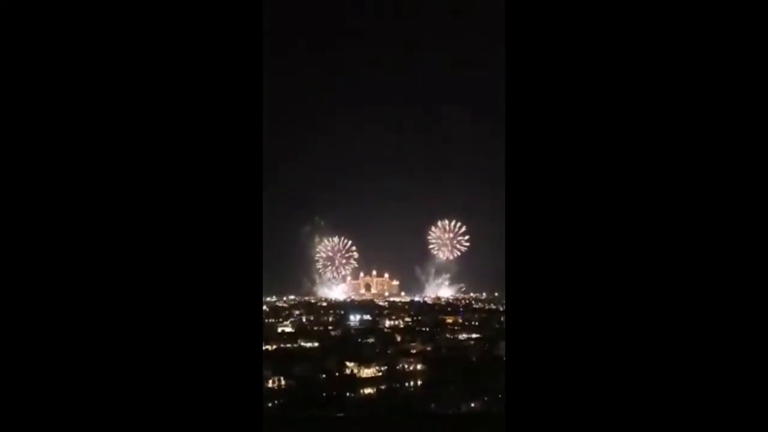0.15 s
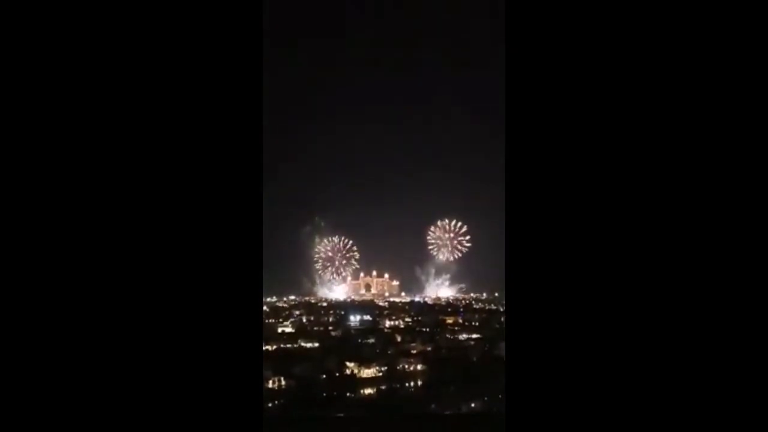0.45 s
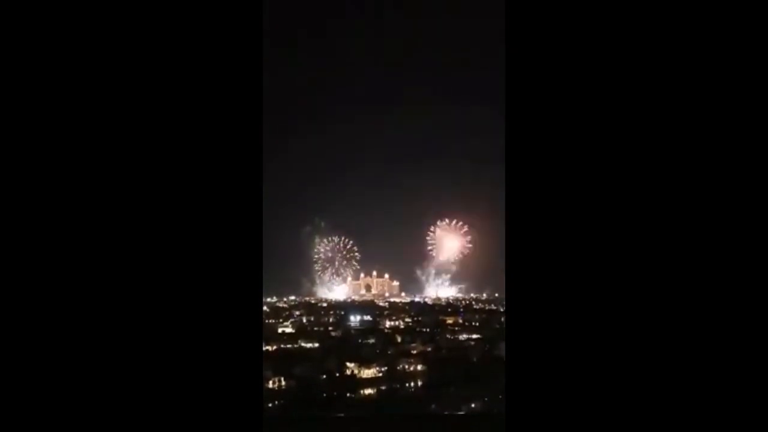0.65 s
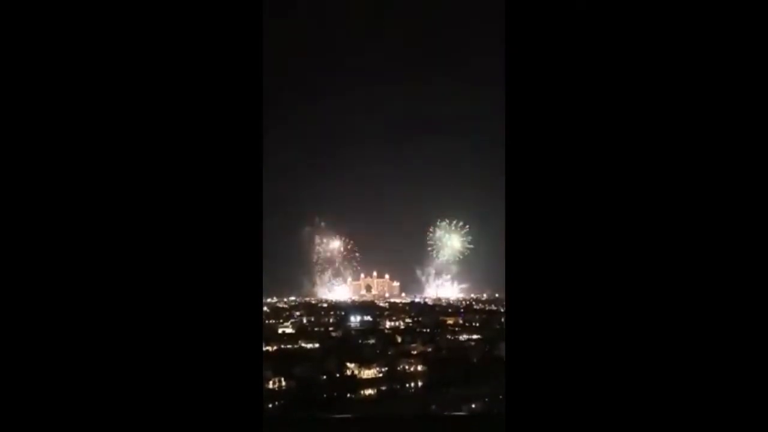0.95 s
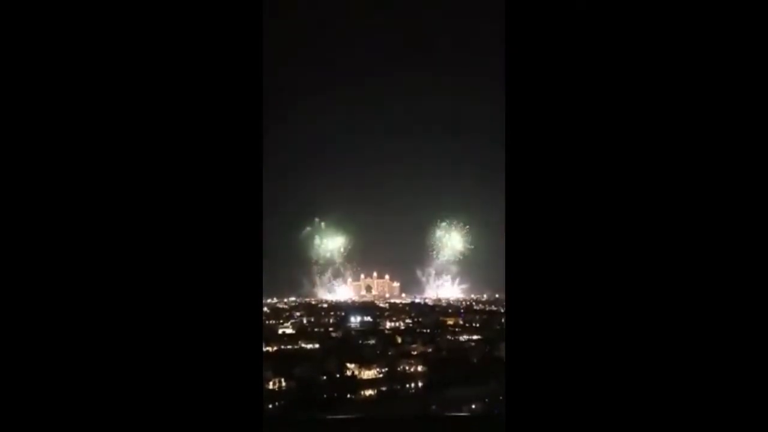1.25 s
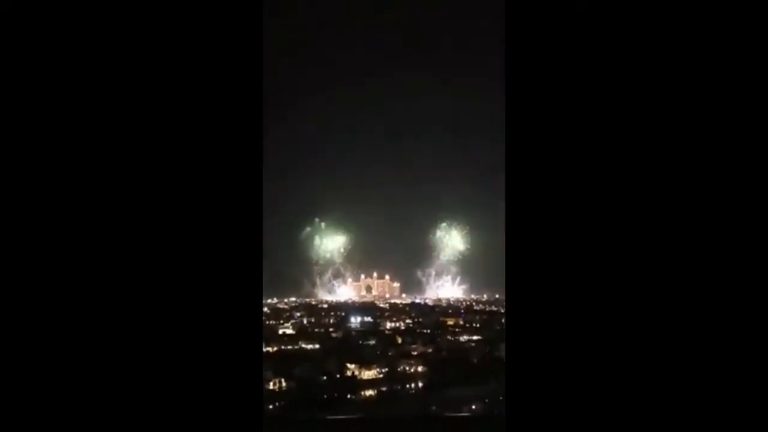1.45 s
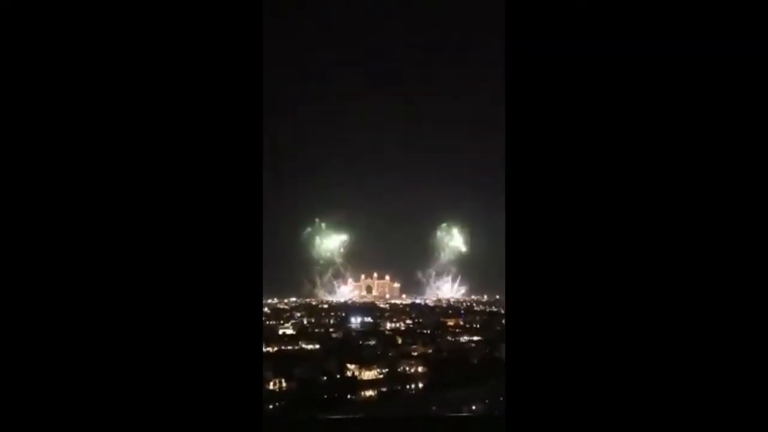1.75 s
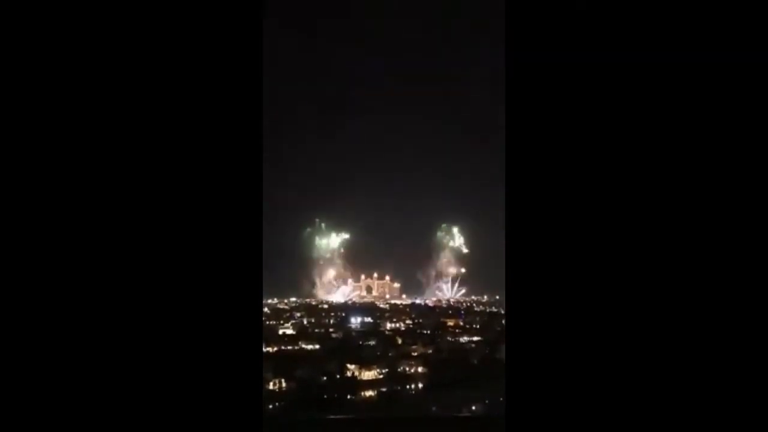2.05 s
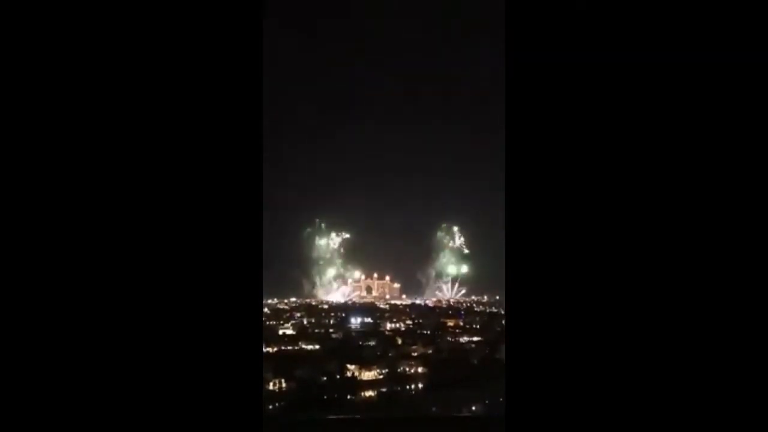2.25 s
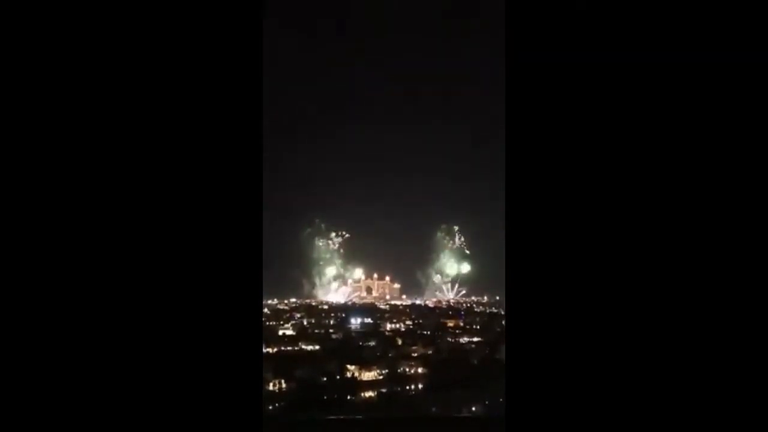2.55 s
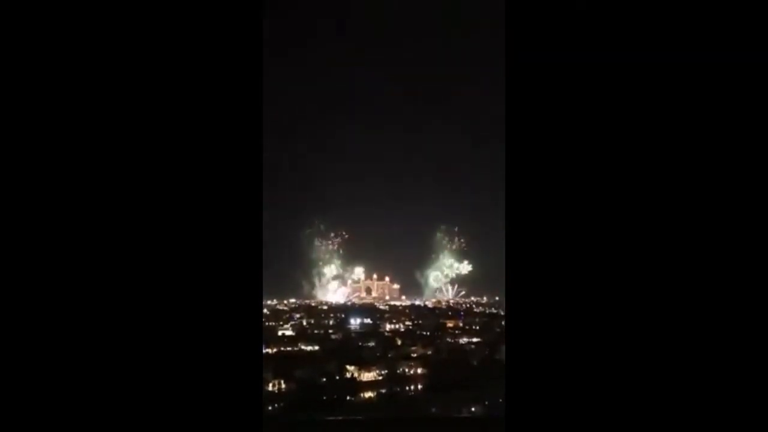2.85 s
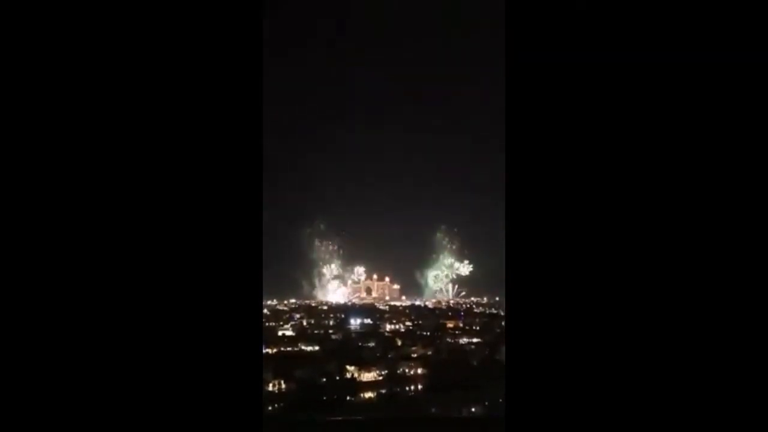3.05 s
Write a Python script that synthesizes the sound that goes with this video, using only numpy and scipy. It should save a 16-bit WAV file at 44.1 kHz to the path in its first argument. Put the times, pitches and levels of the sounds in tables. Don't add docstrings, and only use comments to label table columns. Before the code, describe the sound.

Distant fireworks heard from a balcony at night: a dull double boom early, another midway, then the strongest salvo, each rolling back from buildings over a low traffic hum. Wide stereo, far microphone, treble softened by air.

```python
import sys
import numpy as np
from scipy import signal
from scipy.fft import rfft, irfft
from scipy.io import wavfile

SR = 44100
rng = np.random.default_rng(int(sys.argv[2]) if len(sys.argv) > 2 else 0)


def file_out(sig):
    cols = np.atleast_2d(sig).T
    lim = np.clip(cols, -1, 1)
    pcm = np.round(lim * 32767).astype(np.int16)
    wavfile.write(sys.argv[1], SR, pcm)


def magnitude_from_level(level_db):
    exponent = np.asarray(level_db, float) / 20
    return 10 ** exponent


N = 141120


def rms_one(x):
    return x / np.sqrt(np.mean(x ** 2) + 1e-20)


def at_hz(points, hz, column=1):
    points = np.array(points)
    return np.interp(np.log(hz), np.log(points[:, 0]), points[:, column])


def drift(rate_hz):
    step = 40
    r = np.exp(-2 * np.pi * rate_hz * step / SR)
    warm_up = 2000
    chance = rng.standard_normal(N // step + 2 + warm_up)
    slow = signal.lfilter([1], [1, -2 * r, r * r], chance)[warm_up:]
    return np.interp(np.arange(N) / step, np.arange(len(slow)), rms_one(slow))


def ring(x, hz, t60_s):
    r, w = magnitude_from_level(-60 / (t60_s * SR)), 2 * np.pi * hz / SR
    return signal.lfilter([0, np.sin(w)], [1, -2 * r * np.cos(w), r * r], x + 1e-18)


def die_away(x, t60_s):
    return signal.lfilter([1], [1, -magnitude_from_level(-60 / (t60_s * SR))], x + 1e-18)


def cut(x, hz, kind, order=2):
    return signal.sosfilt(signal.butter(order, hz, kind, fs=SR, output="sos"), x + 1e-18)


# pitch_hz, likeness
LEFT_RIGHT_LIKENESS = [(60, 0.99), (130, 0.96), (270, 0.96), (580, 0.5), (1200, 0.42), (2600, 0.13),
                       (5000, 0.088), (9000, 0.08)]


def bands(top_hz):
    edges = 22 * 2 ** np.arange(0, np.log2(top_hz / 22), .5)
    white = rng.standard_normal((2, 2, N))
    for k, (low, high) in enumerate(zip(edges, edges[1:])):
        mid, side = cut(white[k % 2], [low, high], "band")
        hz = np.sqrt(low * high)
        alike = np.clip(at_hz(LEFT_RIGHT_LIKENESS, hz), -1, 1)
        yield hz, np.sqrt(1 + alike) * mid + np.sqrt(1 - alike) * side * [[1], [-1]]


# pitch_hz, level_db (per Hz)
CITY_RUMBLE = [(25, -70), (40, -59), (60, -64), (110, -67.5), (250, -68.5), (350, -72.5), (450, -83),
               (650, -81.5)]
# pitch_hz, level_db (per Hz)
NIGHT_HISS = [(1300, -86.5), (2000, -95), (3200, -103), (5000, -111), (8000, -115), (10000, -132),
              (13500, -150)]


def city():
    city_db, bass_lumps_db, other_lumps_db = -39, 1.5, .4
    together = drift(2.2)
    total = 0
    for hz, noise in bands(20000):
        lumps_db = bass_lumps_db if hz < 400 else other_lumps_db
        wander_db = lumps_db * (.5 * together + drift(6.1))
        total = total + noise * magnitude_from_level(at_hz(CITY_RUMBLE + NIGHT_HISS, hz) + wander_db)
    return magnitude_from_level(city_db) * rms_one(total)


def chirps(rows):
    edge_s = .01
    t, out = np.arange(N) / SR, 0
    for s, length, hz, width_hz, db in rows:
        gate = np.clip(np.minimum(t - s, (s + length - t) / 2) / edge_s, 0, 1)
        breath = cut(rng.standard_normal(N), [hz - width_hz / 2, hz + width_hz / 2], "band", order=3)
        out = out + magnitude_from_level(db) * gate * rms_one(breath)
    return out


# start_s, length_s, pitch_hz, width_hz, level_db
CHIRPS_ON_RIGHT = [
    (0.66, 0.067, 8480, 500, -70),
    (.71, 0.063, 8300, 700, -80),
    (1.07, .065, 3980, 250, -71),
    (1.13, .06, 3750, 250, -68),
    (1.17, .13, 3680, 250, -71),
    (1.07, .05, 5400, 500, -75),
    (1.29, 0.046, 3900, 350, -75),
    (1.03, .04, 2900, 400, -70),
    (2.99, 0.071, 3000, 300, -71),
    (3.12, 0.072, 2943, 300, -71),
]
# start_s, length_s, pitch_hz, width_hz, level_db
CHIRPS_IN_FRONT = [
    (1.222, 0.032, 4100, 2000, -58),
    (2.725, 0.056, 7100, 2300, -72),
    (1.223, .02, 2900, 900, -61),
    (2.81, .04, 1100, 270, -69),
    (3.4, 0.017, 1200, 81, -58),
]


def creatures():
    pan_db = 5
    right = chirps(CHIRPS_ON_RIGHT) * magnitude_from_level(np.array([[-pan_db], [pan_db]]))
    return right + chirps(CHIRPS_IN_FRONT)


def pushes(s, db, ms, cut_hz):
    t = (np.arange(N) / SR - np.c_[s]) / np.c_[ms] * 1000
    wave = (t >= 0) * (t < 2) * (1 - t)
    return cut(magnitude_from_level(np.c_[db]) * wave, cut_hz, "low", order=3)


# time_s, level_db
SALVO_SWELL = [
    (0, -4),
    (.5, -1),
    (1.198, -0.5),
    (1.65, 0.5),
    (2.0, 11.5),
    (2.498, 9.5),
    (2.9, 6.5),
    (3.2, 8),
]
AIR_CUT_HZ = 566


def far_salvo():
    shells_per_s, push_db, push_ms, spread_db = 40, -45, 2.505, 1.5
    strength = magnitude_from_level(spread_db * np.minimum(rng.exponential(1, N), 3))
    born = (rng.random(N) < shells_per_s / SR) * strength
    born = born * magnitude_from_level(np.interp(np.arange(N) / SR, *np.transpose(SALVO_SWELL)))
    one_push = pushes([0], [push_db], [push_ms], AIR_CUT_HZ)[0, :SR // 10]
    return signal.fftconvolve(born, one_push)[:N]


# pitch_hz, level_db, t60_s
BUILDING_ROLL = [(40.3, -39.5, 0.49), (80, -37, 0.83), (163, -35, 1), (272, -35.5, 1), (400, -32.5, 0.74),
                 (650, -30.5, 0.37), (1200, -35, 0.71)]


def roll(x):
    rise_s, swell_s, swell_width_s, swell_db, wide_db = 0.0092, .155, 0.066, -47.5, 6.5
    t = np.arange(N) / SR
    tail = 0
    for hz, noise in bands(2900):
        fall_db = 60 * t / at_hz(BUILDING_ROLL, hz, column=2)
        tail = tail + noise / np.sqrt(hz) * magnitude_from_level(at_hz(BUILDING_ROLL, hz) - fall_db)
    undo_db = 60 * np.minimum(t, .5) / at_hz(BUILDING_ROLL, 250, column=2) - at_hz(BUILDING_ROLL, 250)
    swell = cut(tail * magnitude_from_level(undo_db), [181, 340], "band")
    swell = magnitude_from_level(swell_db) * swell * np.exp(-((t - swell_s) / swell_width_s) ** 2)
    tail = tail * (1 - np.exp(-t / rise_s)) + swell
    tail = tail + (magnitude_from_level(wide_db) - 1) * (tail - tail.mean(0))
    return 10 * signal.fftconvolve(tail, x[None])[:, :N]


# pitch_hz, level_db, t60_s
BALCONY_NOTES = [(57.1, -49.5, 0.27), (107.36, -44.5, .5), (152.4, -51.5, 0.33), (181.6, -60, 0.3),
                 (243, -48.5, 0.19), (386.8, -41, 0.17), (437.7, -47, .25), (501.6, -52, .3),
                 (686, -49, 0.16)]


def balcony(rows, far, wet_db):
    scatter_db = 1.5 * rng.standard_normal((len(rows), len(BALCONY_NOTES)))
    strength = magnitude_from_level(np.c_[wet_db] + scatter_db)
    return sum(magnitude_from_level(level_db) * ring(strength[:, k] @ rows + far, hz, t60_s)
               for k, (hz, level_db, t60_s) in enumerate(BALCONY_NOTES))


# pitch_hz, level_db, t60_s
CRACK_NOTES = [(900, -31, 0.024), (1365, -24, 0.025), (1715, -20.5, 0.018), (2060, -24.5, 0.014),
               (2563, -28.5, 0.015), (3190, -34, .01), (4150, -36, .012)]


def cracks():
    burst_t60_s, tail_t60_s, tail_db = .03, .3, -13
    spray_ring_share = .35
    full_crack_db, treble_from_hz, treble_loss = -12, 2200, .6
    s, db, _, _, crack_db = np.transpose(SHELLS)
    level = db + crack_db
    noise, out = rng.standard_normal((2, N)), 0
    for k, (hz, level_db, t60_s) in enumerate(CRACK_NOTES):
        octaves = max(np.log2(hz / treble_from_hz), 0)
        lost_db = treble_loss * octaves * np.clip(full_crack_db - level, 0, 12)
        clicks = np.zeros(N)
        clicks[(s * SR).astype(int)] = magnitude_from_level(level - lost_db)
        fade = die_away(clicks, burst_t60_s) + magnitude_from_level(tail_db) * die_away(clicks, tail_t60_s)
        mid, side = noise * 0.26 * fade
        spray = ring(mid + 0.73 * side * [[1], [-1]], hz, spray_ring_share * t60_s)
        out = out + magnitude_from_level(level_db) * (-1) ** k * (ring(1.7 * clicks, hz, t60_s) + spray)
    return cut(out, 4700, "low", order=4)


# start_s, peak_db, push_ms, roll_db, crack_db
SHELLS = [(.5217, -10, 1.65, -2, -7.5), (.5405, -17, 1.3, 0, -15), (.5765, -11.5, 1.704, 1, -23.5),
          (1.6985, -12.5, 1.69, 0.5, -10.5), (1.738, -19, 1.8, -2, -23.5), (1.9887, -7, 1.4, 0.5, -6),
          (2.0205, -13.5, 1.6, -1, -7.5), (2.009, -13, 4.4, -14, -15), (1.7105, -20, 1.8, -7.5, -22.5),
          (2.592, -26.5, 2.185, 2, -12), (2.8828, -21, 1.5, -1, -14), (2.9035, -27, 1.5, 0.5, -19),
          (.4745, -30, .75, -9, -3), (.88, -31, 2.2, -0.5, -11), (1.835, -25, 2.0, -4.5, -22),
          (1.80, -27, 2.0, -3.5, -22), (1.3, -30.5, 1.7, -11, -7), (.74, -31, 2.2, -0.5, -21),
          (2.2, -30, 2, 7.5, -8), (0.0034, -35, 2.2, -1.5, -20), (.08, -33, 2.2, -1, -14),
          (2.45, -33, 2.0, 1, -25)]
# start_s, peak_db, push_ms, roll_db
THUDS = [(.55, -19.5, 5.9, -16), (1.243, -30.5, 6.9, -5.5), (1.698, -25.5, 4.77, -1.5),
         (1.841, -31, 7, -3.5), (1.9895, -8, 3.8, -5), (1.9999, -11, 3.8, -8.5), (2.098, -18, 5, -8.5),
         (2.438, -32, 8, -2), (2.582, -23.5, 5, -8.5), (2.762, -28.5, 9, -5.5), (3.049, -34, 6.2, -3),
         (.2, -36.5, 6.5, 1), (.35, -32.5, 6.1, -3.5), (2.66, -31, 10, -8), (.004, -39.5, 9.3, 1.5)]
# start_s, peak_db, push_ms, roll_db, cut_hz
ECHOES = [(0.525, -11.5, 2.1, -5, 340), (0.5292, -17, 2.1, -6.5, 380), (0.5344, -20, 2.1, -6.5, 380),
          (0.5966, -22, 3, -15, 450), (.6135, -21, 2.6, -15, 400), (.651, -24, 2.2, -8, 400),
          (.703, -25, 3.2, -2, 330), (.7595, -27, 1.8, -8, 400), (1.7077, -25, 1.5, -12, 700),
          (1.7185, -25, 2.6, -15, 602), (1.7295, -27, 1.8, -12, 600), (1.8235, -28, 2.4, -4, 350),
          (1.8405, -27, 2.2, -4, 350), (1.871, -29, 2.4, -4, 350), (2.027, -18, 3.5, -18, 552),
          (2.0355, -21, 3.5, -18, 300), (2.0455, -12, 4, -18, 250), (2.0575, -26, 1.3, -6, 600),
          (2.064, -16, 4, -18, 500), (2.0736, -26, 1.3, -6, 598), (2.082, -17, 4, -18, 500),
          (2.109, -23, 6.6, -18, 220), (2.1262, -18, 4, -18, 250), (2.831, -29, 4, -12.5, 300),
          (2.8895, -29, 1.8, -6, 500), (2.895, -28, 1.9, -6, 450), (2.918, -30, 1.8, -6, 500),
          (2.928, -28, 1.9, -6, 400)]


def booms():
    direct_db, bearing_spread_db, thud_cut_hz = 2.5, .7, 195
    s, db, ms, wet_db = np.transpose([row[:4] for row in SHELLS + THUDS + ECHOES])
    n, m = len(SHELLS), len(SHELLS + THUDS)
    shells = pushes(s[:n], db[:n], ms[:n], AIR_CUT_HZ)
    thuds = pushes(s[n:m], db[n:m], ms[n:m], thud_cut_hz)
    echoes = [pushes([t], [peak_db], [push_ms], hz) for t, peak_db, push_ms, _, hz in ECHOES]
    rows = np.concatenate([shells, thuds] + echoes)
    far = far_salvo()
    side_db = bearing_spread_db * rng.standard_normal(len(s)) * [[1], [-1]]
    direct = magnitude_from_level(direct_db + side_db) @ rows
    return direct + far + balcony(rows, far, wet_db) + roll(magnitude_from_level(wet_db) @ rows + far)


def scene():
    return city() + creatures() + cracks() + booms()


# pitch_hz, level_db
LEFT_LEAD = [(30, 0), (70, .9), (270, .2), (500, 2.6), (1200, 2.6), (2600, .4), (5000, 0), (9000, -2.2)]


def microphones(dry):
    hz = np.maximum(np.fft.rfftfreq(N, 1 / SR), 1)
    colour_db = at_hz(LEFT_LEAD, hz) / 2 * np.array([[1], [-1]])
    return cut(irfft(rfft(dry) * magnitude_from_level(colour_db), N), 33, "high")


def low_pass(x):
    return signal.sosfilt(signal.butter(12, 13700, fs=SR, output="sos"), x)


def record(dry):
    mix = microphones(dry)
    return low_pass(mix)


dry = scene()
out = record(dry)
file_out(out)
```